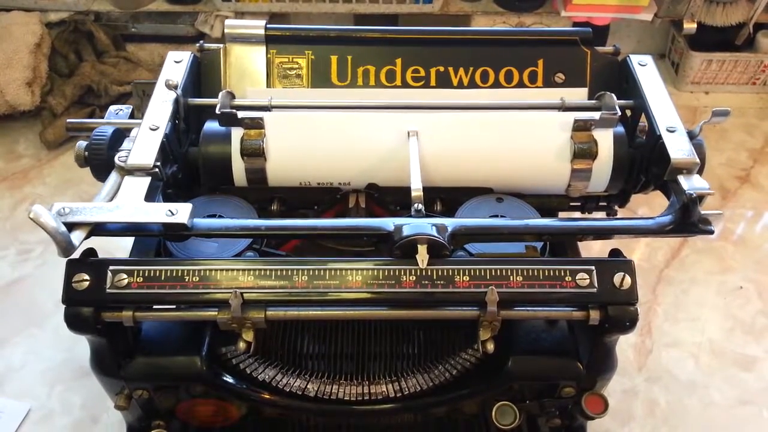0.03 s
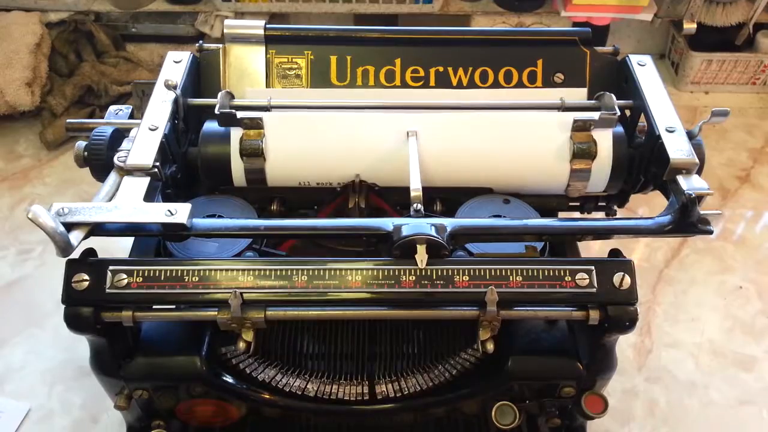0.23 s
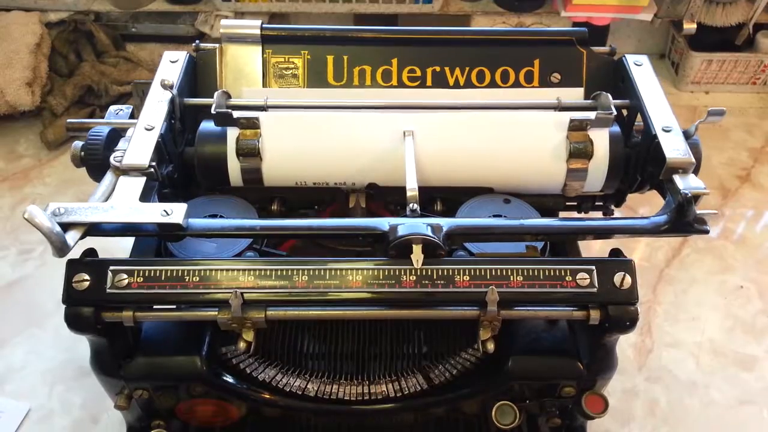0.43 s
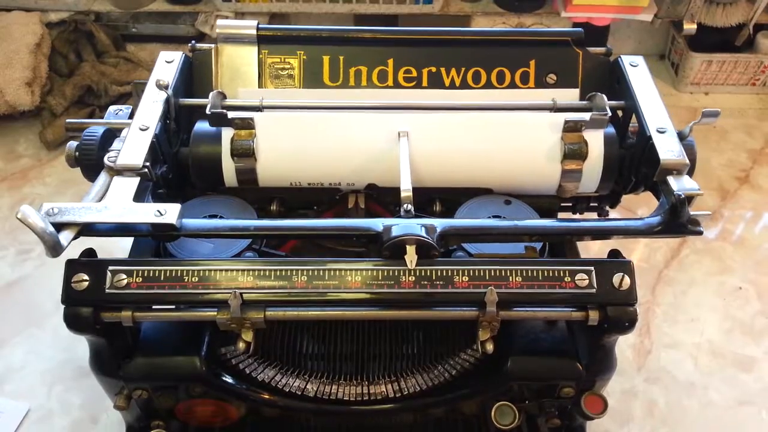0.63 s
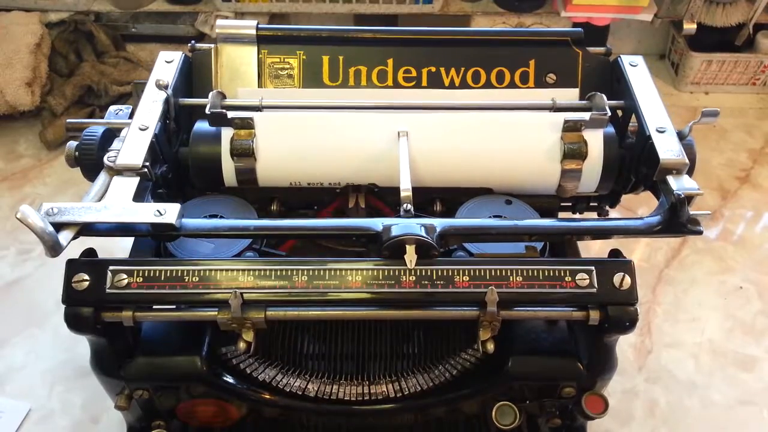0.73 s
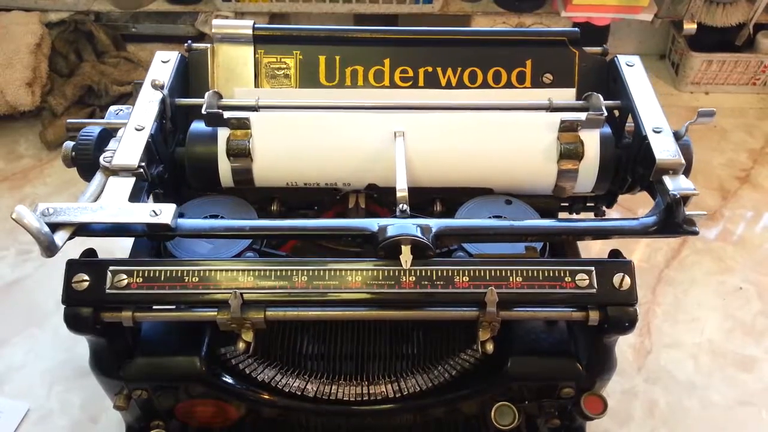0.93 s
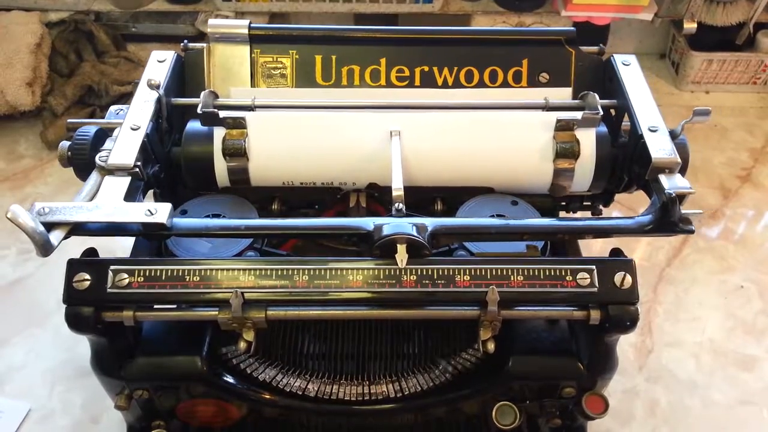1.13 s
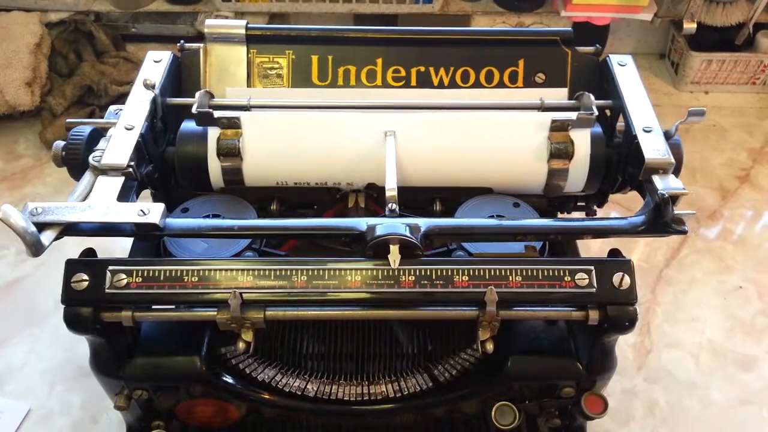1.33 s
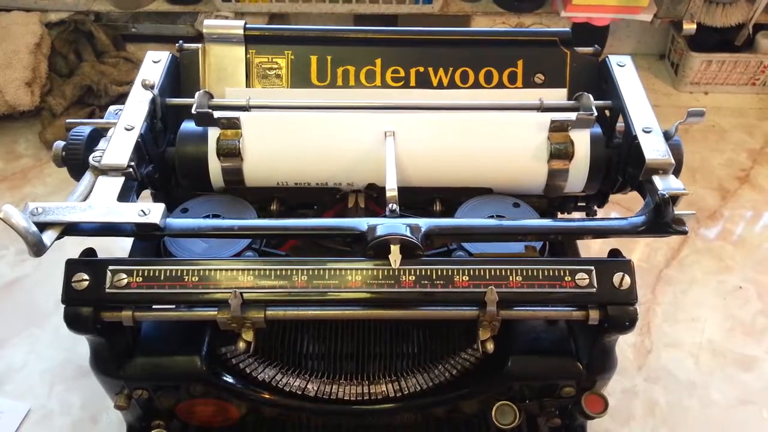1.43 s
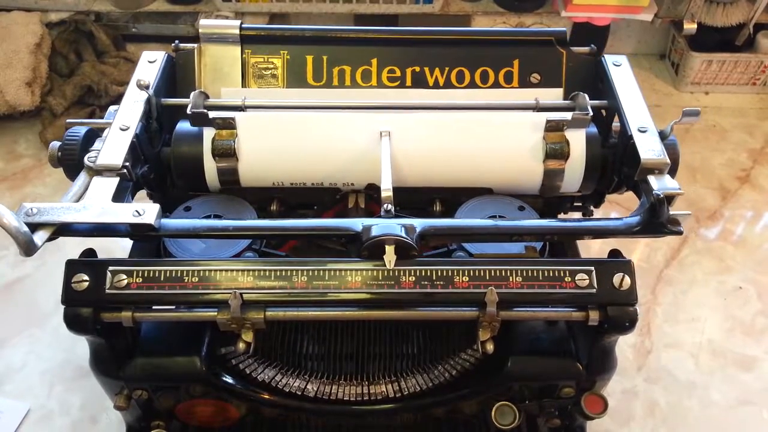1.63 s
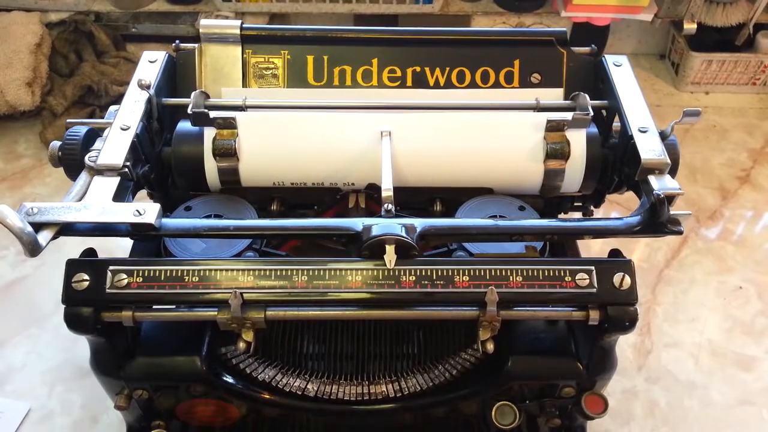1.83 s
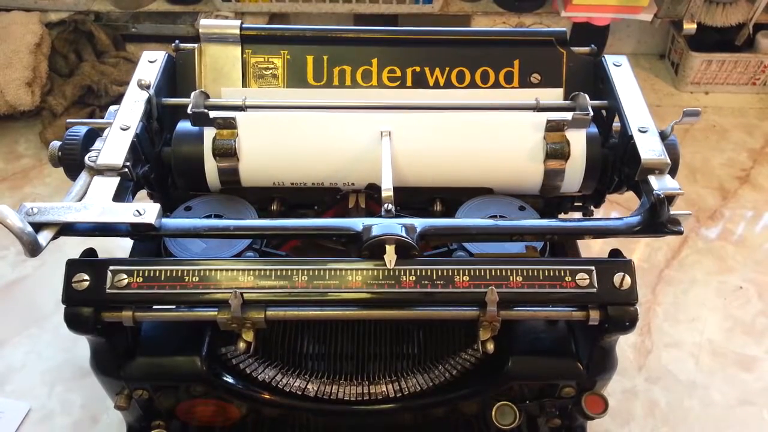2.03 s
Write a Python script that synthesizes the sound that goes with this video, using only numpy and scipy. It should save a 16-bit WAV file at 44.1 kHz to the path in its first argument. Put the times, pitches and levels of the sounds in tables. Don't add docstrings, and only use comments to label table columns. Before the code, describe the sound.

Old manual typewriter, very close: two hard key slaps, a softer rattling space bar, then three more slaps, each trailed by metal clicks and carriage steps, over a steady fan-like hum in a small room.

```python
import sys
import numpy as np
from scipy import signal
from scipy.fft import rfft, irfft
from scipy.io import wavfile
from scipy.ndimage import uniform_filter1d

SR = 44100
rng = np.random.default_rng(int(sys.argv[2]) if len(sys.argv) > 2 else 0)


def unload_audio(sound):
    columns = np.transpose(np.atleast_2d(sound))
    steps = np.round(np.clip(columns, -1, 1) * 32767)
    wavfile.write(sys.argv[1], SR, steps.astype(np.int16))


def invert_db(level):
    return 10 ** (np.asarray(level, dtype=float) / 20)


N = 92610

# f/Hz, level/dB per Hz
HUM_TONE = [(18, -63), (30, -48), (48, -13), (208, -10), (505, -4.5), (591, -7.5), (6050, -29),
            (13600, -41.5), (15500, -72)]
# f/Hz, bandwidth/Hz, level/dB
HUM_DRONES = [(102.7, 1.3, -54.5), (145.3, 3.2, -52.5), (207.4, 39, -43), (257.3, 24, -40),
              (295, 46, -42.5), (390.6, 3.4, -48), (463, 107, -41)]
# f/Hz, likeness
HUM_LIKENESS = [(40, 0.91), (120, 1), (300, 1), (520, 0.74), (1000, 0.39), (4000, 0.12)]
HUM_DB, SWELL_DB, HUM_LAG_S = -33, 0.7, 0.00032
WANDER_DB, WANDER_HZ = 2, 4.89

# t/s, peak level/dB, length/s
KEY_PRESSES = [
    (0.207, -29.5, 0.0043),
    (0.459, -26.5, 0.028),
    (1.0168, -22, 0.0056),
    (1.264, -21.5, 0.0087),
    (1.5315, -23.5, 0.006),
    (1.806, -35.5, 0.009),
]
# f/Hz, level/dB per Hz
KEY_TONE = [(1530, -3), (2600, 3), (4470, 5), (6090, 2), (10300, 1.5), (11900, 2.5), (15000, -1.5)]

# t/s, peak level/dB
LINK_TICKS = [(0.2355, -26), (0.316, -26), (0.365, -21), (.3747, -30), (.389, -22), (.4032, -24),
              (.4137, -26), (.467, -22), (0.496, -11.5), (.5113, -21), (.5312, -41), (0.6067, -27),
              (.6425, -17.5), (.767, -36), (0.779, -26), (.897, -30), (.909, -25), (0.92, -26),
              (.9263, -24), (.9487, -35), (1.019, -32), (1.0226, -44), (1.095, -23), (1.1256, -17.5),
              (1.1418, -15.5), (1.1434, -34), (1.1486, -43), (1.1636, -27), (1.1693, -31), (1.1822, -14),
              (1.1887, -33), (1.2655, -28), (1.269, -31), (1.3945, -34), (1.400, -28), (1.4311, -18),
              (1.439, -28), (1.536, -35), (1.567, -24), (1.592, -22), (1.596, -24), (1.605, -25),
              (1.6723, -31), (1.68, -30), (1.6892, -24.5), (1.7025, -31), (1.7443, -32)]
# f/Hz, level/dB, t60/s, left-right/dB
LINK_MODES = [(1613, 2, 0.019, 4), (2170, -2.5, 0.017, -16), (2910, 0.5, 0.019, -5), (3700, -15, 0.0058, 6),
              (4970, 1, 0.016, 10), (6700, -31, 0.0034, 2), (8180, -6, 0.012, 18), (11100, -9, 0.0085, 8),
              (12900, -11, .006, 1.1)]

STRIKE_TIMES = [.2507, .5033, 1.0599, 1.3073, 1.5740]
# peak level/dB, clatter level/dB, crack level/dB, rebound level/dB
STRIKE_LEVELS = [
    (-1.9, -16.5, -11, -17),
    (0, -15, -5, -11),
    (-1.5, -19, -11, -20),
    (0, -16, -7, -12),
    (2, -14.5, -10, -11),
]
# lead/s, level/dB
BAR_SWINGS = [
    (.012, -25),
    (.0108, -21.5),
    (.012, -23.5),
    (0.011, -22.5),
    (0.0051, -25),
]
# f/Hz, level/dB, t60/s, left-right/dB
PLATEN_MODES = [(599, -9, 0.039, -4.5), (710, -7.5, 0.036, -5), (1106, -16, 0.074, -6),
                (1243, -7.5, 0.029, -8.5), (1700, -10, 0.023, -18), (1910, 9.5, 0.0078, 3.5),
                (1846, -4.5, 0.018, -13.5), (2110, -13, 0.024, 18), (2260, -13.5, 0.042, -8),
                (2784, -12, 0.032, 13.5), (3165, -6.5, 0.03, 9), (4300, -19.5, 0.05, -20),
                (4870, -13, 0.022, 27), (6340, -11, 0.023, -13)]
# f/Hz, level/dB, t60/s, left-right/dB
RACK_MODES = [(1550, -7, .016, 0), (2400, -9, .014, 1), (2900, 0, .017, 2), (3150, -5, .014, 2),
              (4700, -9, .012, 2)]
# f/Hz, level/dB per Hz
CLATTER_TONE = [(950, -12), (1500, -4.5), (2080, -5.5), (5400, -7), (6060, -7), (10100, -13.5),
                (13900, -15), (15000, -28)]
SWING_RISE_S, SWING_FALL_DB, REBOUND_S = 0.003, -150, 0.0066
CRACK_RISE_S, CRACK_T60 = 0.0007, 0.019
CLATTER_RISE_S, CLATTER_T60, SHAKE_DB, SHAKE_T60 = 0.003, 0.078, -13.5, 0.37

# t/s, peak level/dB, length/s, ring level/dB
CARRIAGE_STEPS = [
    (.340, -29, 0.0069, 2),
    (.3525, -26, 0.032, 7),
    (.5965, -26.5, 0.028, 8),
    (.9035, -29.5, 0.01, 4.5),
    (1.135, -22.5, 0.029, 6.5),
    (1.384, -24.5, 0.011, 5.5),
    (1.654, -31.5, 0.0076, -6),
    (1.6675, -28, 0.038, 9.5),
]
# f/Hz, level/dB per Hz
ESCAPEMENT_TONE = [(530, -11), (900, -3.5), (2540, -2), (2890, 1), (7060, -8), (12500, -9.5), (15000, -15),
                   (15500, -22)]

# t/s, peak level/dB, length/s, ring level/dB
BAR_RETURNS = [
    (.3905, -13, 0.0021, -7.5),
    (.6385, -22, 0.0099, -4.5),
    (1.1775, -17.5, 0.0068, -3.5),
    (1.4255, -20, 0.0047, 1),
    (1.7115, -20.5, 0.0051, -10),
]
# f/Hz, level/dB per Hz
BAR_TONE = [(410, -11), (1100, -1.5), (2160, -2.5), (6100, -7), (7800, -5.5), (9600, -9.5), (14200, -12),
            (15500, -20)]
# f/Hz, level/dB, t60/s, left-right/dB
REST_MODES = [(1250, -7, .035, 0), (1530, -4, .035, 0), (1850, -1, .04, 1), (2050, 0, .04, 2),
              (2370, -4, .03, 2), (4900, -9, .02, 2)]

# t/s, peak level/dB
DESK_THUDS = [
    (0.391, -15.5),
    (0.639, -38),
    (0.906, -27),
    (1.18, -25.5),
    (1.426, -25),
    (1.64, -30.5),
    (1.714, -29.5),
]
# f/Hz, level/dB, t60/s, left-right/dB
DESK_MODES = [(69, -3.5, 0.089, 3.5), (97.5, -6.5, 0.33, -4.5), (140, -6, 0.14, 5), (213, -7, 0.11, -4),
              (312, -16, 0.069, 0), (390.5, 3, 0.096, -2), (471.4, -6, 0.24, 2), (552, 7, 0.034, 3)]

# t/s, peak level/dB, length/s
SPACE_RATTLES = [
    (0.7615, -24.5, 0.018),
    (0.778, -24.5, 0.025),
    (0.8824, -30, 0.021),
    (0.919, -26.5, 0.021),
    (0.941, -32, 0.011),
    (0.964, -35.5, 0.012),
]
# f/Hz, level/dB per Hz
SPACE_BAR_TONE = [(530, -38), (900, -16), (1210, -6), (4900, -6.5), (9820, -10), (13500, -11.5),
                  (15000, -14)]

# f/Hz, likeness
KEYS_LIKENESS = [(60, 0.75), (180, 0.89), (550, 0.96), (1650, 0.78), (4970, 0), (15000, -0.0)]
# f/Hz, left-right/dB
KEYS_TILT = [(60, 11), (180, 15), (550, -7), (1650, 5), (4970, 1.5), (15000, 0.2)]
KEYS_LAG_S, CONTACT_S, GRAIN_DB = 0.00003, 0.0004, 1.5
RELEASE_T60, LOOSE_DB, LOOSE_T60 = 0.072, -14, 0.39

# f/Hz, t60/s
ROOM_T60 = [(300, 0.86), (2000, 0.28), (8000, 0.14), (15000, 0.43)]
ROOM_DB = -13.5
EDGE_HZ, LOW_CUT_HZ = 14720, 74
GATE_HZ, GATE_DB = 8000, -84.5
HUSH_S, HUSH_HZ, HUSH_SHARE = 0.018, 4500, 0.22


def evened(x):
    return x / np.sqrt(np.mean(x ** 2) + 1e-20)


def read(points, hz):
    f, value = np.transpose(points)
    return np.interp(np.log(hz + 1), np.log(f + 1), value)


def add(mix, s, sound):
    part = mix[..., round(s * SR):][..., :sound.shape[-1]]
    part += sound[..., :part.shape[-1]]


def noise_spectrum():
    return rfft(rng.standard_normal((2, N)))


def coloured(tone, low_slope_db=12):
    hz = np.fft.rfftfreq(N, 1 / SR)
    fall = low_slope_db * np.minimum(np.log2((hz + 1) / tone[0][0]), 0)
    return evened(irfft(noise_spectrum() * invert_db(read(tone, hz) + fall), N))


def ports(pair, likeness, lag_s, tilt):
    hz = np.fft.rfftfreq(N, 1 / SR)
    a, b = rfft(pair)
    c = np.clip(read(likeness, hz), 0, 1)
    half = np.exp(1j * np.pi * hz * lag_s) * invert_db(0.5 * read(tilt, hz))
    return irfft(np.array([a * half, (c * a + np.sqrt(1 - c ** 2) * b) / half]), N)


def ring(modes, spread_db, detune, blow_s, apart_hz):
    t = np.arange(round(0.3 * SR)) / SR
    hz, db, t60, side_db = np.transpose(modes)[:, :, None]
    luck = rng.standard_normal((len(modes), 3))
    size = invert_db(db + spread_db * luck[:, :1] - 60 * t / t60)
    turn = 2 * np.pi * hz * (1 + detune * luck[:, 1:2]) * t
    shift = (hz / apart_hz) ** 2 * luck[:, 2:]
    pair = np.array([(size * invert_db(k * side_db / 2) * np.sin(turn + k * shift)).sum(0) for k in (1, -1)])
    pair = pair * np.minimum(t / blow_s, 1)
    return pair / abs(pair.mean(0)).max()


def grain():
    return invert_db(GRAIN_DB * evened(uniform_filter1d(rng.standard_normal(N), size=50)))


def rattles(rows, tone, modes, rise_s, crest_db):
    rings, shape, t = np.zeros((2, N)), np.zeros(N), np.arange(SR // 2) / SR
    for s, db, length, *ring_db in rows:
        late = np.maximum(t - length, 0)
        release = invert_db(-60 * late / RELEASE_T60 - 237 * t)
        loose = invert_db(LOOSE_DB - 60 * t / LOOSE_T60)
        rise = np.minimum(t / rise_s, 1)
        add(shape, s + CONTACT_S, invert_db(db - crest_db) * rise * (release + loose))
        if modes is not None:
            add(rings, s + CONTACT_S, invert_db(db + ring_db[0]) * ring(modes, 1.5, 0.015, 0.0007, 6000))
    return rings + ports(shape * grain() * coloured(tone), KEYS_LIKENESS, KEYS_LAG_S, KEYS_TILT)


def wander(count):
    t = np.arange(0, N, 64) / SR
    f = np.geomspace(0.4, WANDER_HZ, num=12)[:, None]
    rows = []
    for _ in range(count):
        waves = np.sin(2 * np.pi * (f * t + rng.random((12, 1)))) / np.sqrt(f)
        rows.append(evened(waves.sum(0)).repeat(64)[:N])
    return rows


def hum():
    hz, t = np.fft.rfftfreq(N, 1 / SR), np.arange(N) / SR
    drones = np.zeros((2, N))
    for (f, width, db), drift in zip(HUM_DRONES, wander(len(HUM_DRONES))):
        resonance = 1 / (1 + (2 * (hz - f) / width) ** 2)
        drones += invert_db(db + WANDER_DB * drift) * evened(irfft(noise_spectrum() * resonance, N))
    swell = np.zeros(N)
    for f in np.geomspace(0.5, 8, num=16):
        swell += np.sin(2 * np.pi * (f * t + rng.random())) / np.sqrt(f)
    broad = invert_db(HUM_DB + SWELL_DB * evened(swell)) * coloured(HUM_TONE)
    return ports(broad + drones, HUM_LIKENESS, HUM_LAG_S, [(100, 0.082), (9000, 1.0)])


def key_presses():
    return rattles(KEY_PRESSES, KEY_TONE, None, rise_s=0.003, crest_db=5.5)


def link_ticks():
    out = np.zeros((2, N))
    for s, db in LINK_TICKS:
        add(out, s, invert_db(db) * ring(LINK_MODES, 4.5, 0.06, 0.0003, 3500))
    return out


def strikes():
    slap, shape, t = np.zeros((2, N)), np.zeros(N), np.arange(SR // 2) / SR
    for s, levels, (lead, swing_db) in zip(STRIKE_TIMES, STRIKE_LEVELS, BAR_SWINGS):
        db, clatter_db, crack_db, rebound_db = levels
        add(slap, s, invert_db(db) * ring(PLATEN_MODES, 0.9, 0.0087, 0.00046, 4160))
        add(slap, s + REBOUND_S, invert_db(rebound_db) * ring(PLATEN_MODES, 1.6, 0.015, 0.0006, 2900))

        crack = np.minimum(t / CRACK_RISE_S, 1) * invert_db(crack_db - 60 * t / CRACK_T60)
        decay = invert_db(-60 * t / CLATTER_T60) + invert_db(SHAKE_DB - 60 * t / SHAKE_T60)
        clatter = invert_db(clatter_db) * np.minimum(t / CLATTER_RISE_S, 1) * decay
        add(shape, s, crack + clatter)

        u = t[t < lead + CRACK_RISE_S]
        add(shape, s - lead, invert_db(swing_db + SWING_FALL_DB * u) * np.minimum(u / SWING_RISE_S, 1))
        release = invert_db(swing_db + 3) * ring(RACK_MODES, 2.5, 0.02, 0.001, 3000)
        add(slap, s - lead + SWING_RISE_S / 2, release)
    noise = shape * grain() * coloured(CLATTER_TONE, low_slope_db=3)
    return slap + ports(noise, KEYS_LIKENESS, KEYS_LAG_S, KEYS_TILT)


def carriage_steps():
    return rattles(CARRIAGE_STEPS, ESCAPEMENT_TONE, RACK_MODES, rise_s=0.00061, crest_db=3.8)


def bar_returns():
    return rattles(BAR_RETURNS, BAR_TONE, REST_MODES, rise_s=0.0012, crest_db=5.5)


def desk_thuds():
    out = np.zeros((2, N))
    for s, db in DESK_THUDS:
        add(out, s, invert_db(db) * ring(DESK_MODES, 1.5, 0.02, 0.003, 3000))
    return out


def space_bar():
    return rattles(SPACE_RATTLES, SPACE_BAR_TONE, None, rise_s=0.0056, crest_db=10.2)


def room(x):
    taps = np.zeros((2, SR // 2))
    at = np.arange(400, SR // 2 - 20, 20) + rng.integers(0, 20, (2, (SR // 2 - 401) // 20))
    np.put_along_axis(taps, at, rng.choice([-1., 1.], at.shape), 1)
    hz, t, z = signal.stft(taps, SR, nperseg=256)
    decay = invert_db(-60 * t / read(ROOM_T60, hz)[:, None])
    tail = signal.istft(z * decay, SR, nperseg=256)[1]
    return signal.fftconvolve(x[None], tail / np.linalg.norm(tail[0]), axes=1)[:, :N]


def scene():
    machine = key_presses() + link_ticks() + strikes() + carriage_steps()
    machine = machine + bar_returns() + desk_thuds() + space_bar()
    return hum() + machine + invert_db(ROOM_DB) * room(machine[0])


def gate(x):
    hz, _, z = signal.stft(x, SR, nperseg=1024, noverlap=512)
    band = abs(z[:, :512] ** 2).reshape(2, 64, 8, -1).mean((0, 2)).repeat(8, 0)
    keep = np.clip((10 * np.log10(band + 1e-20) - GATE_DB) / 2, 0, 1)
    keep = np.minimum(keep + (hz[:512, None] < GATE_HZ), 1)
    return signal.istft(z * np.pad(keep, ((0, 1), (0, 0))), SR, nperseg=1024, noverlap=512)[1][:, :N]


def hush(x):
    hz, t, z = signal.stft(x, SR, nperseg=128, noverlap=64)
    lost = rng.random((16, len(t) // 2 + 1)) < HUSH_SHARE
    lost = lost.repeat(4, 0).repeat(2, 1)[:, :len(t)]
    swings = [s - lead for s, (lead, _) in zip(STRIKE_TIMES, BAR_SWINGS)]
    attacks = np.array([row[0] for row in KEY_PRESSES[2:5]] + swings[1::3])[:, None]
    ahead = ((t < attacks - 0.002) & (t > attacks - HUSH_S)).any(0)
    keep = 1 - lost * (hz[:64, None] > HUSH_HZ) * ahead
    return signal.istft(z * np.pad(keep, ((0, 1), (0, 0))), SR, nperseg=128, noverlap=64)[1][:, :N]


def low_pass(x):
    return signal.sosfilt(signal.butter(12, 15920, fs=SR, output="sos"), x)


def record(dry):
    treble_cut = signal.firwin(255, EDGE_HZ, window=("kaiser", 7), fs=SR)
    limited = signal.oaconvolve(dry, treble_cut[None], "same")
    limited = signal.sosfilt(signal.butter(2, LOW_CUT_HZ, "high", fs=SR, output="sos"), limited)
    mix = np.clip(hush(gate(limited)), -0.98, 0.98)
    return low_pass(mix)


dry = scene()
out = record(dry)
unload_audio(out)
```